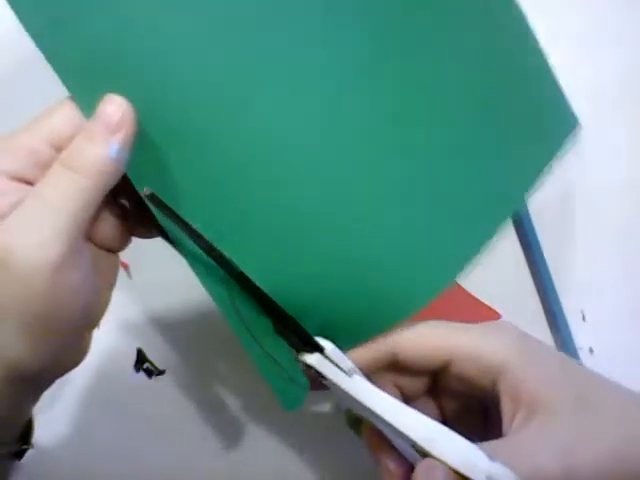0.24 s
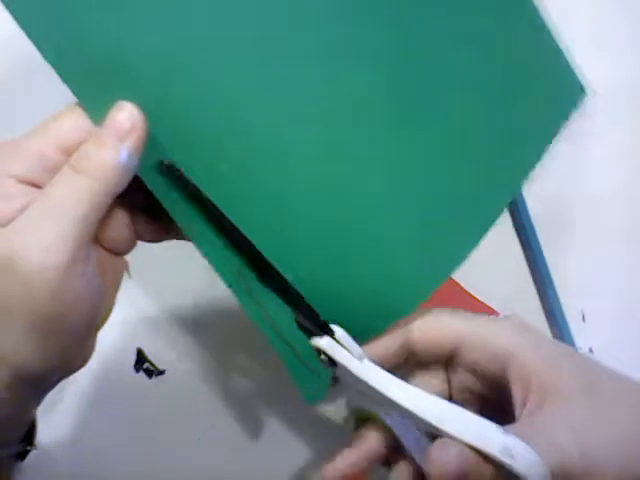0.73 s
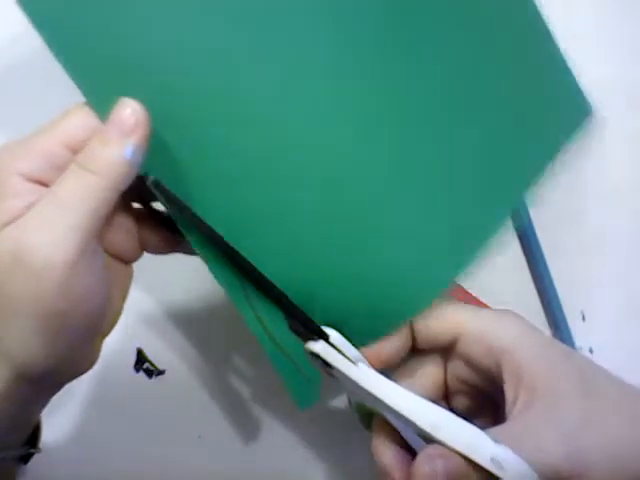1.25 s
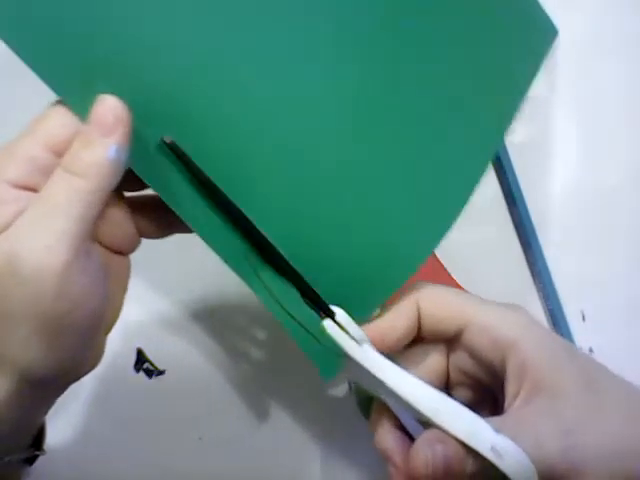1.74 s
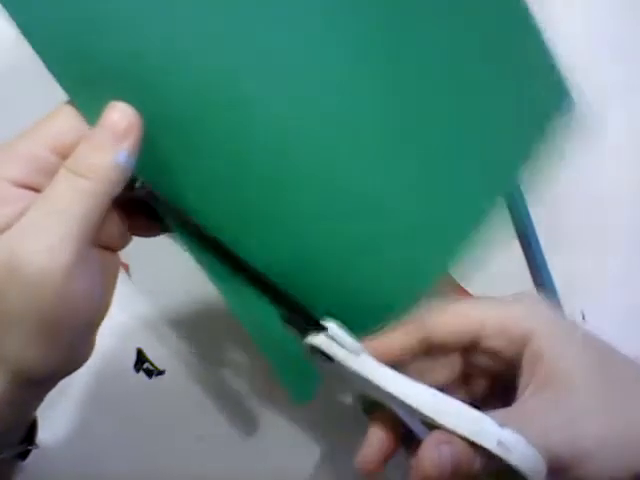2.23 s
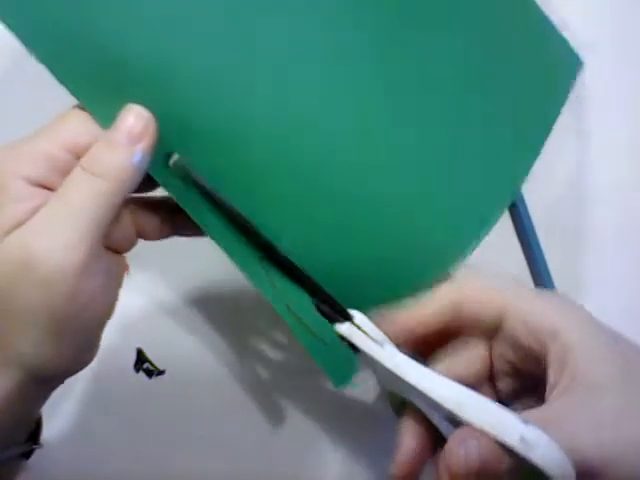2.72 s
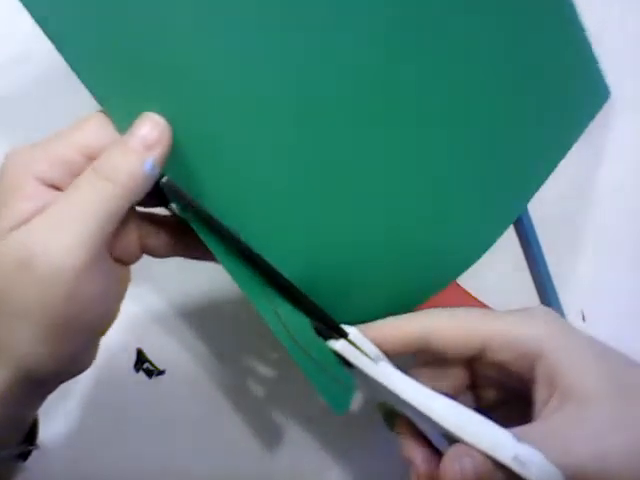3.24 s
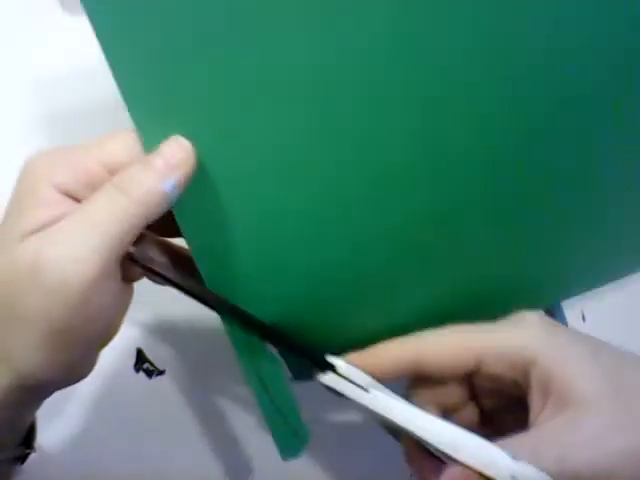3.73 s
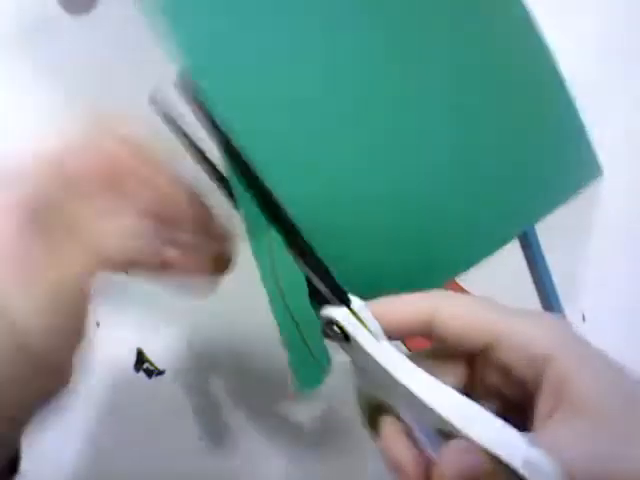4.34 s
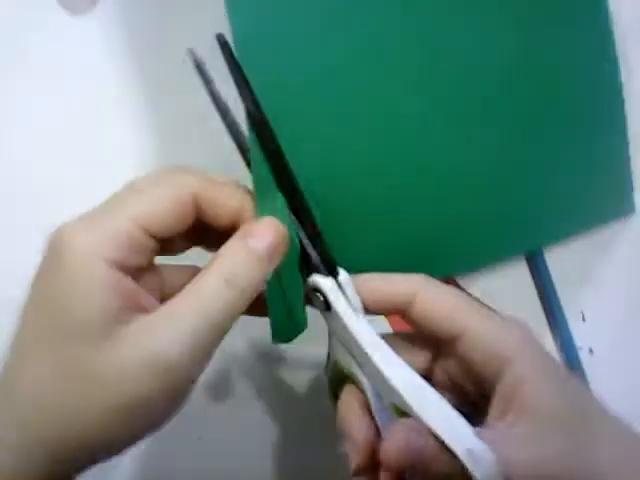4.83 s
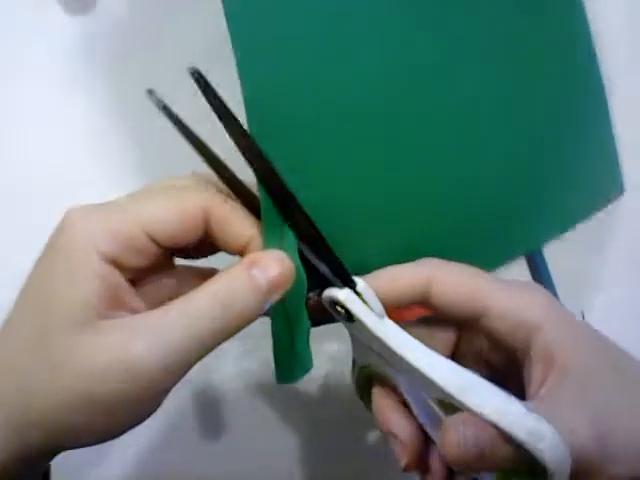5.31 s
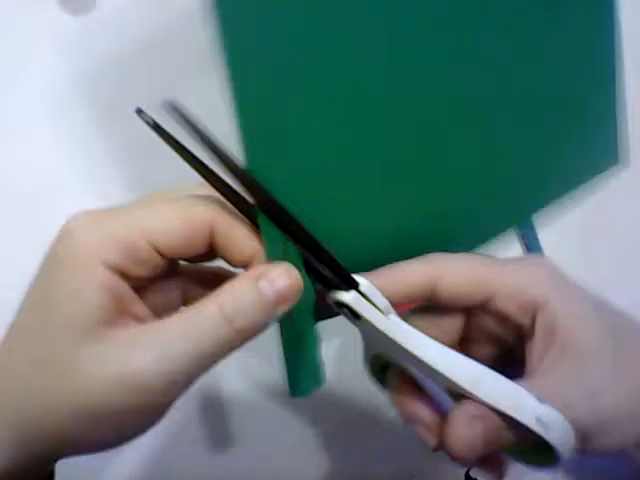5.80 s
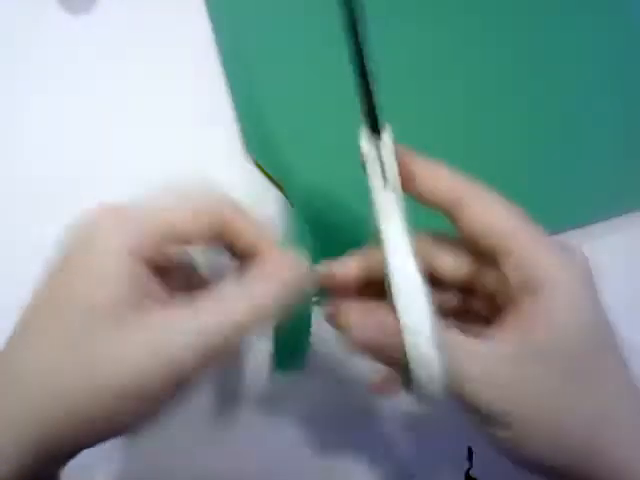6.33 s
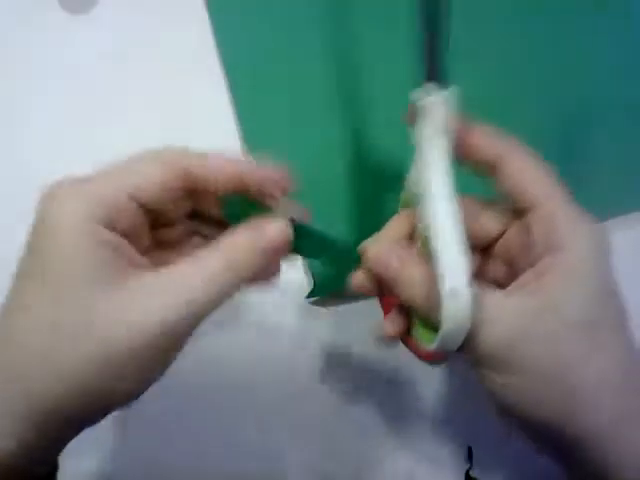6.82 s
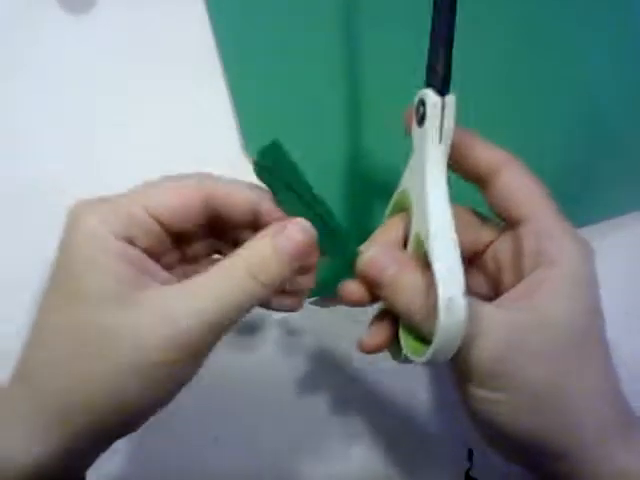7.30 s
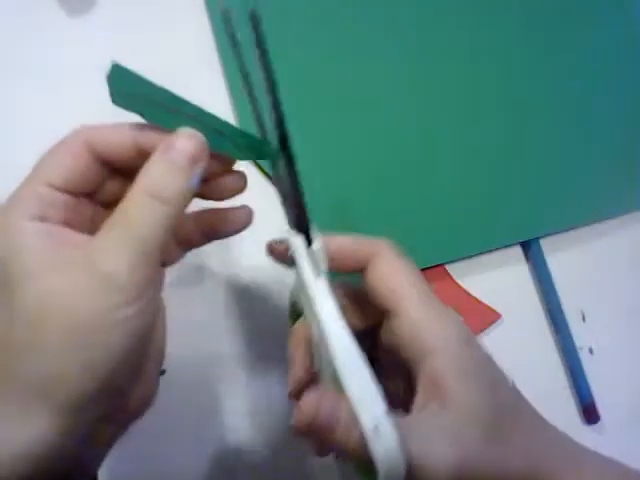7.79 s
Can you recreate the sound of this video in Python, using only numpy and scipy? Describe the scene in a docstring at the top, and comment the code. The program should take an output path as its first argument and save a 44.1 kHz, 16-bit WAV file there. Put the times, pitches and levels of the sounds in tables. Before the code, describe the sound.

Close to a table in a small, fairly dry room, scissors cut stiff card. Light crunches come first, then a loud cluster of hollow snaps, more fibrous snips and scrapes, and a pause before another cut. Card slides over steel and fingers between squeezes. Finally only faint brushing of the loose strip remains, with one small sharp flick, over steady soft hiss and low handling rumble.

```python
"""A dry room, heard close to a table, where scissors cut a strip off a sheet of stiff card.
Cuts, slides of card over steel and skin, and fingertip brushes are grain noise through resonances or filters.
Snaps of the card and ticks of the blades are single releases of force that ring the sheet.
Steady hiss, a dull handling rumble and a low shake that grows with the work lie beneath; a short tail follows."""
import sys
import numpy as np
from scipy import signal
from scipy.fft import rfft, irfft, next_fast_len
from scipy.io import wavfile
from scipy.ndimage import uniform_filter1d, map_coordinates

SR = 44100
rng = np.random.default_rng(int(sys.argv[2]) if len(sys.argv) > 2 else 0)


def wav_out(sig):
    """Save sig, one row per channel (or a flat mono array), as 16-bit PCM at SR to the path in sys.argv[1]."""
    wavfile.write(sys.argv[1], SR, np.round(np.clip(np.atleast_2d(sig).T, -1, 1) * 32767).astype(np.int16))


N = 355181

# Slow flexing of the card. Each row: frequency in Hz, relative power density in dB per Hz.
FLEX_SPECTRUM = [(15, -71), (60, -28), (130, -11), (210, -10), (290, -1), (420, 1), (560, 5), (720, 2.5),
                 (1200, -36), (6000, -82.5)]


def amp(db):
    """Level law: decibels to an amplitude ratio."""
    return 10 ** (np.asarray(db) / 20)


def unit(x):
    """Normalisation: a signal scaled to rms 1."""
    return x / np.sqrt(np.mean(x ** 2) + 1e-20)


def along(points, hz):
    """Logarithmic frequency scale: (Hz, value) points interpolated along log frequency."""
    f, v = np.transpose(points)
    return np.interp(np.log(hz + 1), np.log(f), v)


def wobble(rate, size=N):
    """Band-limited random process: a spline through random knots, rate knots a second."""
    knots = rng.standard_normal(int(size * rate / SR) + 4)
    return map_coordinates(knots, [np.arange(size) * rate / SR])


def filtered(x, response):
    """Linear filtering: the spectrum of x times a response of frequency."""
    m = 2 * next_fast_len(len(x) // 2 + 2048)
    return irfft(rfft(x, m) * response(np.fft.rfftfreq(m, 1 / SR)), m)[:len(x)]


def coloured(x, spectrum):
    """Minimum-phase filtering: x through a causal filter of the given spectrum, at rms 1."""
    def response(hz):
        cepstrum = irfft(np.log(amp(along(spectrum, hz))))
        half = len(cepstrum) // 2
        # folding the cepstrum onto positive times makes the filter causal
        folded = np.r_[cepstrum[0], 2 * cepstrum[1:half], np.zeros(half)]
        return np.exp(rfft(folded))
    return unit(filtered(x, response))


def tilted(spectrum, tilt_db, pivot_hz=3500):
    """Spectral tilt: the card's angle on the blades leans a spectrum within an octave of the pivot."""
    return [(hz, db + tilt_db * np.clip(np.log2(hz / pivot_hz), -1, 1)) for hz, db in spectrum]


def grains(size, rate, spread_db, clump_db, clump_rate):
    """Stick-slip as shot noise: tiny impulses of uneven size that come in clumps, at rms 1."""
    sizes = amp(spread_db * np.clip(rng.standard_normal(size), -2, 2))
    sizes = sizes * rng.choice([-1, 1], size)
    happens = rng.random(size) < rate / SR
    clumps = amp(clump_db * wobble(clump_rate, size=size))
    return unit(sizes * happens * clumps)


def scattered(x, share, reach=.004, drift=0.002, count=6):
    """Comb filtering: moving hands and card add near copies whose notches wander; at rms 1."""
    t = np.arange(len(x)) / SR
    paths = rng.uniform(-1, 1, (count, 2))
    copies = []
    for way, speed in paths:
        # reach is the longest initial delay in s; drift is the fastest change of delay in s per s
        arrival = t - reach * abs(way) - drift * speed * t
        copies.append(np.sign(way) * np.interp(arrival, t, x, left=0))
    return unit(x + share * sum(copies))


def sheet(x, s, soft_hz=1750):
    """Modal resonance: x through the broad modes of the card as it is held at time s, at rms 1."""
    # The main resonance follows how tightly the sheet is held and bent.
    # Each row: time in seconds, main resonance in Hz.
    grip = [(0.45, 590), (1.26, 790), (1.72, 770), (2.01, 680), (2.21, 830), (2.47, 795), (2.78, 840),
            (3.46, 728), (4.02, 800), (4.21, 590), (4.57, 610), (4.75, 790), (5.45, 696), (5.82, 560),
            (5.96, 580), (6.3, 584)]
    # Modes of the held sheet. Each row: multiple of the main resonance, width in Hz, level in dB.
    modes = [(0.543, 57.8, -13.5), (.82, 79.4, -9), (1.003, 116, 5), (1.197, 102, -0.5), (1.44, 69.7, -6),
             (1.696, 103.4, -12), (2.05, 68, -12.5)]
    main_hz = np.interp(s, *np.transpose(grip))

    def mode(f, hz, width):
        return 1j * f * width / (hz * hz - f * f + 1j * f * width)

    def response(f):
        return sum(amp(db) * mode(f, ratio * main_hz, width) for ratio, width, db in modes)

    # soft card radiates only the middle range
    radiating = signal.butter(4, [.52 * main_hz, soft_hz], "bandpass", fs=SR, output="sos")
    return unit(signal.sosfilt(radiating, filtered(x, response)))


def strokes(table, voice, catch_db, let_go_db, fade):
    """Common modulation: one effort catches, builds, holds and dies away, driving all layers of a stroke.

    It starts catch_db under its top and ends let_go_db under the end of its hold; fade is in seconds."""
    out, t = np.zeros(N + SR), np.arange(SR // 2) / SR
    for s, rise, hold, fall, sag_db, *sound in table:
        knots = fade + np.cumsum([0, rise, hold, fall])
        effort_db = np.interp(t, knots, [-catch_db, 0, -sag_db, -sag_db - let_go_db])
        gate = np.clip(np.minimum(t, knots[-1] + fade - t) / fade, 0, 1)
        stroke = gate * amp(effort_db) * voice(s + rise + hold / 2, len(t), *sound)
        out[round((s - fade) * SR):][:len(t)] += stroke
    return out[:N]


def background(work):
    """Superposed noise: steady hiss, a soft rumble of moving hands, a low shake that swells with work."""
    # Dull rumble of hands on sheet and table. Each row: time in seconds, mean level in dB.
    handling = [(0, -74), (.4, -82.5), (1.1, -68), (2.1, -82), (3.3, -79), (4.199, -64.5), (4.6, -79.5),
                (5.3, -72.5), (5.7, -63.5), (6.3, -72), (7.1, -77), (7.3, -69), (7.45, -78), (8.05, -72.5)]
    # Spectra of the rumble, the shaken hands and table, and the room hiss.
    # Each row: frequency in Hz, relative power density in dB per Hz.
    rumble_spectrum = [(35, -40.5), (70, -9), (105, -6.5), (130, 1), (180, -8), (300, -21), (600, -60)]
    shake_spectrum = [(20, -58), (60, -9), (100, -8), (135, -1.5), (180, -6.5), (260, -7), (600, -70),
                      (3000, -100)]
    hiss_spectrum = [(15, -49.5), (25, -25), (49, -7), (152, -8), (322, -10), (389, -10.5), (469, -13.5),
                     (684, -14), (895, -16.5), (1080, -18), (1570, -19.5), (4500, -22.5), (5280, -17),
                     (7700, -33.5), (15500, -47)]
    hiss_db = -69
    # shake_db is reached at work_db and grows by shake_grows dB for each dB of work
    shake_db, work_db, shake_grows, average_s = -65.5, -40.5, 0.76, 0.084

    handling_db = np.interp(np.arange(N) / SR, *np.transpose(handling))
    rumble = amp(handling_db + 2.3 * wobble(10)) * coloured(rng.standard_normal(N), rumble_spectrum)
    power = np.abs(uniform_filter1d(work ** 2, round(average_s * SR)))
    effort = np.sqrt(power) / amp(work_db)
    shake = amp(shake_db) * effort ** shake_grows * coloured(rng.standard_normal(N), shake_spectrum)
    hiss = amp(hiss_db) * coloured(rng.standard_normal(N), hiss_spectrum)
    return rumble + shake + hiss


def slide(s, size, ring_db, flex_db, hiss_db, tilt_db):
    """Sliding friction: card drags over steel and skin in finer, more even slips."""
    # Rubbing hiss. Each row: frequency in Hz, relative power density in dB per Hz.
    rub_spectrum = [(700, -83), (1600, 6.5), (2400, 8.5), (3300, 3), (4400, 3.5), (5800, 1.5), (7500, -9),
                    (9500, -17.5), (11500, -42), (15500, -69)]
    slips = grains(size, rate=10000, spread_db=6.0, clump_db=2.45, clump_rate=122.4)
    rub = scattered(coloured(slips, tilted(rub_spectrum, tilt_db)), share=0.37)
    ring = amp(ring_db) * sheet(slips, s)
    flexing = amp(flex_db) * coloured(slips, FLEX_SPECTRUM)
    return ring + flexing + amp(hiss_db) * rub


def room(x, first_wall=.004):
    """Reverberation: a short decaying noise tail whose pattern changes as the hands move."""
    # Decay of the room. Each row: frequency in Hz, time to fall by 60 dB in seconds.
    decay = [(150, 0.88), (700, 0.18), (1400, 0.32), (4000, 0.32), (10000, 0.2)]
    out, hop = np.zeros(N + 2 * SR), SR // 4
    for start in range(0, N, hop):
        hz, t, z = signal.stft(rng.standard_normal(SR // 2), SR, nperseg=256)
        dying = amp(-60 * t / along(decay, hz)[:, None])
        tail = signal.istft(z * dying, SR, nperseg=256)[1]
        wet = signal.fftconvolve(x[start:start + hop], tail / np.linalg.norm(tail))
        out[start + round(first_wall * SR):][:len(wet)] += wet
    return out[:N]


def release(t, bright_db, t60, splinter=0.17, soft_db=-62, hard_db=-40, scuff_rise=0.0012, scuff_stretch=0.56):
    """Impulsive excitation: bright snaps let go at once, dull ones build up and scuff for longer."""
    soft = np.clip((hard_db - bright_db) / (hard_db - soft_db), .02, 1)
    swell = 1 - np.exp(-t / (soft * scuff_rise))
    dying = amp(-60 * t / (t60 * (1 + soft * scuff_stretch)))
    impulse = (1 - soft) * (t == 0)
    return impulse + splinter * swell * dying * rng.standard_normal(len(t))


def snapping(splinter_t60=0.022, tick_t60=0.011, push_t60=0.0066, hardness=0.43):
    """Impulse response: each snap is brief splintering, a blade tick and a shove that rings the sheet."""
    # Snaps of the card and ticks of the blades, as energy spread over snap_s.
    # Each row: start in seconds, sheet knock in dB, crack in dB, bright tick in dB.
    snap_table = [(0.274, -57, -78, -88), (0.664, -40, -51.5, -85), (0.7866, -41.5, -38, -74),
                  (0.876, -35.5, -43, -61.5), (0.908, -39.5, -50, -81), (0.951, -41.5, -74, -63),
                  (1.0543, -45, -63, -53), (1.129, -45.5, -45.5, -67), (1.672, -24, -25.5, -35.5),
                  (1.7622, -30, -30.5, -33), (1.767, -27.5, -47, -47), (1.7746, -30, -32.5, -35),
                  (1.7771, -24, -43, -57), (1.785, -46, -37, -45), (1.985, -43, -51.5, -65),
                  (2.012, -39.5, -65, -58), (2.047, -43, -49, -62), (2.2, -63, -54.5, -62),
                  (2.268, -45, -38.5, -60), (2.343, -41.5, -37, -64), (2.487, -48, -46.5, -75),
                  (2.767, -36, -35, -42.5), (2.8243, -29, -33.5, -48), (2.984, -44, -39.5, -74),
                  (3.453, -39, -69, -66), (3.704, -43, -41, -44.5), (3.729, -49, -37, -44.5),
                  (3.773, -35, -41.5, -72), (3.882, -37.5, -43, -77), (4.234, -57, -46, -50),
                  (4.247, -43, -46, -42.5), (4.582, -66, -55, -51.5), (5.39, -53.5, -56, -34.5),
                  (5.789, -33.5, -62, -58.5), (5.8811, -52, -31, -35.5), (5.9166, -46, -38.5, -49),
                  (5.968, -67, -69, -54), (6.096, -46.5, -43, -45.5), (6.205, -70, -41.5, -51.5),
                  (6.2301, -65, -39.5, -48), (6.241, -64, -50, -63), (7.58, -72, -57.5, -53)]
    # Spectra of crack and tick. Each row: frequency in Hz, relative power density in dB per Hz.
    crack_spectrum = [(30, -54), (250, -10), (700, -3.5), (1350, 3.5), (1900, 3.5), (2500, 4), (3300, 1),
                      (4300, 1), (5500, -5.5), (7500, -25), (10000, -55), (15000, -49)]
    tick_spectrum = [(3000, -38), (5200, -16), (6400, -0.5), (8500, -3.5), (10200, -9.5)]
    snap_s = 0.0017
    # cracks above hard_crack_db reach further into the tick's top treble, by top_grows dB per dB
    tick_top_db, hard_crack_db, top_grows = -46, -42.5, 1.7
    # a stiffer, quickly damped resonance is at stiff_db for a hard knock and grows faster than the knock
    stiff_hz, stiff_t60, stiff_db, hard_knock_db, stiff_grows = 1315, 0.015, -29.5, -24.5, 2

    out, t = np.zeros(N + SR), np.arange(SR // 20) / SR
    stiff = unit(np.sin(2 * np.pi * stiff_hz * t) * amp(-60 * t / stiff_t60))
    for s, knock_db, crack_db, tick_db in snap_table:
        # a hard shove favours the higher resonances
        shove = signal.lfilter([1, -hardness], [1], release(t, tick_db, push_t60))
        knock = amp(knock_db) * sheet(shove, s)
        knock = knock + amp(stiff_db + stiff_grows * (knock_db - hard_knock_db)) * stiff
        crack = amp(crack_db) * coloured(release(t, tick_db, splinter_t60), crack_spectrum)
        top_db = tick_top_db + top_grows * max(crack_db - hard_crack_db, 0)
        whole_tick = tick_spectrum + [(13200, top_db), (15700, top_db - 19)]
        tick = amp(tick_db) * coloured(release(t, tick_db, tick_t60), whole_tick)
        out[round(s * SR):][:len(t)] += np.sqrt(snap_s / t[-1]) * (knock + crack + tick)
    return out[:N]


def cut(s, size, ring_db, flex_db, fibres_db, tilt_db):
    """Fracture noise: fibres break one after another between the blades, and the same breaks shake the sheet."""
    # Breaking fibres. Each row: frequency in Hz, relative power density in dB per Hz.
    fibre_spectrum = [(30, -52), (250, -18.5), (700, -5.5), (1400, 5), (1850, -8), (2400, -3.5),
                      (3400, -1.5), (4800, -5), (5800, -2), (7500, -12), (9500, -18.5), (12000, -38),
                      (15500, -92)]
    breaks = grains(size, rate=5500, spread_db=7.0, clump_db=-2.5, clump_rate=99)
    crunch = scattered(coloured(breaks, tilted(fibre_spectrum, tilt_db)), share=1.0)
    ring = amp(ring_db) * sheet(breaks, s)
    flexing = amp(flex_db) * coloured(breaks, FLEX_SPECTRUM)
    return ring + flexing + amp(fibres_db) * crunch


def brush(s, size, whisper_db, whistle_db, hz, glide):
    """Friction-driven resonance: fingertips on the strip whisper, with a hoarse whistle that glides."""
    # Thin whisper. Each row: frequency in Hz, relative power density in dB per Hz.
    whisper_spectrum = [(300, -54), (1200, -21), (2800, -8), (4000, -8), (6000, -1.5), (9300, -12),
                        (11000, -25), (15000, -42)]
    # Narrow resonances of the strip. Each row: multiple of the whistle frequency, level in dB.
    strip_modes = [(1.002, 2), (1.981, -5.5), (2.38, -6.5)]
    band_rate = 380  # random knots per second, which set the width of each resonance

    def band():
        return wobble(band_rate, size=size) + 1j * wobble(band_rate, size=size)

    slips = grains(size, rate=9000, spread_db=0, clump_db=2.5, clump_rate=79)
    phase = 2 * np.pi * np.cumsum(hz * 2 ** (glide * np.arange(size) / SR)) / SR
    whistle = unit(sum(amp(db) * np.real(band() * np.exp(1j * multiple * phase))
                       for multiple, db in strip_modes))
    whisper = scattered(coloured(slips, whisper_spectrum), share=0.65)
    return amp(whisper_db) * whisper + amp(whistle_db) * whistle


def scene():
    """Superposition: all the handwork, its room answer and the background."""
    # Squeezes of the blades. Each row: start in seconds, rise, hold and fall in seconds, sag over the hold
    # in dB, sheet ring in dB, slow flexing in dB, breaking fibres in dB, treble tilt in dB per octave.
    cuts = [(0.452, 0.046, 0.073, 0.1, 1.5, -47.5, -57, -49.5, -0.5),
            (0.787, 0.015, 0.075, 0.052, -3.5, -60.5, -71, -52.5, 1.5),
            (1.053, 0.0026, 0.038, 0.1, 10, -52, -54, -45.5, -2.5),
            (2.205, 0.076, 0.066, 0.046, 6, -43.5, -53.5, -39.5, -3.5),
            (2.445, 0.038, 0.053, .09, 3, -44, -64, -48.5, -4.5),
            (2.750, 0.013, .066, 0.046, 1.5, -48.5, -52.5, -40.5, 0.5),
            (2.946, 0.014, 0.031, 0.067, -3, -43, -57, -51, -2),
            (3.695, 0.0088, 0.11, 0.069, 10.5, -37, -48, -40, -1.5),
            (3.871, 0.0083, 0.014, 0.023, 1.5, -41.5, -44, -46, -1.5),
            (5.778, 0.027, 0.046, 0.091, 2.5, -35, -38, -42.5, -2)]
    # Slides of the card over blades and fingers. Each row: start in seconds, rise, hold and fall in seconds,
    # sag in dB, sheet ring in dB, slow flexing in dB, rubbing hiss in dB, treble tilt in dB per octave.
    slides = [(0.090, 0.051, .03, 0.21, 4, -60.5, -65, -66, 2),
              (0.220, 0.038, 0.014, .09, -4.5, -67, -70, -64, -2),
              (0.620, 0.03, 0.058, 0.16, -2, -57.5, -62, -63.5, 1.5),
              (0.938, 0.011, 0.0092, 0.087, 4, -48.5, -48.5, -58, 1.5),
              (1.265, 0.0065, 0.016, 0.069, 2, -62.5, -80, -71, 0),
              (1.445, 0.072, .035, 0.039, 3, -51, -82, -61.5, 0.5),
              (1.635, 0.031, .008, .01, -12, -58, -64, -65, 7),
              (1.975, 0.037, 0.054, 0.063, 6.5, -54, -68, -59.5, 0.5),
              (2.580, 0.015, 0.016, 0.18, 7.5, -52, -71, -55.5, 0),
              (2.724, 0.013, 0.016, 0.021, 2.5, -38.5, -75, -48.5, -5),
              (2.860, 0.018, 0.043, .04, 4, -61, -53.5, -56, 5),
              (3.010, 0.075, 0.067, 0.14, 5.5, -50, -74, -52, 6),
              (3.432, .022, 0.0077, 0.021, -3.5, -49.5, -57, -53.5, 6.5),
              (3.500, .012, 0.018, 0.13, 8.5, -48.5, -58, -56.5, 3),
              (3.910, 0.01, 0.36, .05, 0.5, -80, -90, -68, 10),
              (4.095, 0.03, 0.038, 0.068, 2, -55.5, -61.5, -63, 10),
              (4.120, 0.058, 0.046, .03, -2.5, -63, -61, -54, 9),
              (4.224, 0.031, 0.01, 0.048, 1, -49, -46.5, -46.5, 5.5),
              (4.300, .016, 0.029, 0.091, 5, -42, -57, -49, 2.5),
              (4.440, 0.036, 0.079, 0.027, 0, -65.5, -71, -71.5, 6),
              (4.572, .01, .05, 0.093, 3.5, -60, -69, -57.5, 6),
              (4.768, .008, 0.07, 0.046, -3.5, -69, -83, -75, -3),
              (4.905, 0.036, 0.052, 0.051, 3, -61.5, -79, -58, 5.5),
              (4.970, 0.037, 0.12, 0.092, 0.5, -56, -59.5, -58, 2.5),
              (5.388, 0.026, 0.061, 0.13, 1.5, -58, -66.5, -63, -3.5),
              (5.930, .03, 0.041, 0.097, 1.5, -55, -50.5, -56, 9),
              (5.964, .005, .006, 0.021, 7, -62, -47, -68, 3),
              (6.088, 0.015, 0.063, 0.033, -2, -52.5, -47.5, -60, 7),
              (6.185, 0.0079, 0.035, 0.12, 9, -61, -52, -54, 3),
              (7.420, 0.17, .08, 0.09, 3, -63.5, -63.5, -70, -6)]
    # Fingertips brushing the loose strip. Each row: start in seconds, rise, hold and fall in seconds,
    # sag in dB, whisper in dB, whistle in dB, whistle in Hz, glide in octaves per second.
    brushes = [(6.330, 0.061, 0.22, .08, 1, -80, -78.5, 1584, -0.5),
               (6.605, 0.034, 0.036, 0.13, 2, -68, -90, 2820, 2),
               (6.760, 0.043, 0.055, 0.11, 0, -64.5, -77, 2710, 1),
               (7.568, 0.014, 0.0063, 0.037, 8, -48.5, -52, 2640, -1),
               (7.905, 0.024, 0.15, .05, 3, -69.5, -70, 3030, -1.5)]
    card = strokes(cuts, cut, catch_db=20.7, let_go_db=28.6, fade=.004)
    card = card + strokes(slides, slide, catch_db=12, let_go_db=25.5, fade=.012)
    card = card + strokes(brushes, brush, catch_db=29, let_go_db=10, fade=0.024)
    snaps = snapping()
    reverberation = room(amp(-8.5) * card + amp(-8.0) * snaps)
    return (card + snaps + reverberation + background(card + snaps))[None]


def record(dry):
    """Band limiting: nothing is kept from top_hz upwards."""
    top_hz = 15700
    return np.array([filtered(x, lambda hz: hz < top_hz) for x in dry])


dry = scene()
out = record(dry)
wav_out(out)
```